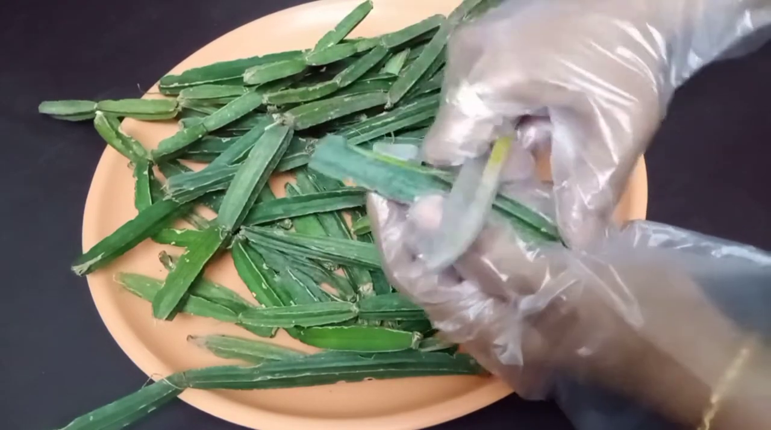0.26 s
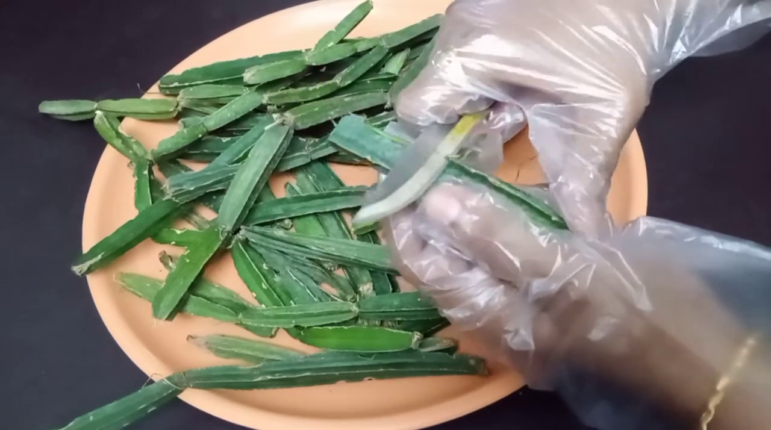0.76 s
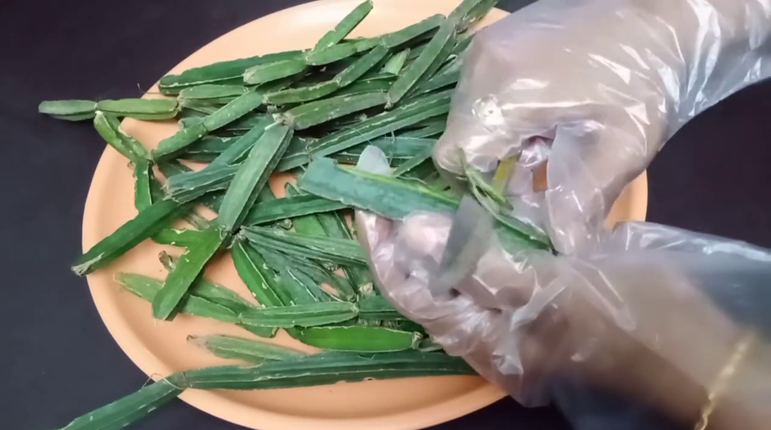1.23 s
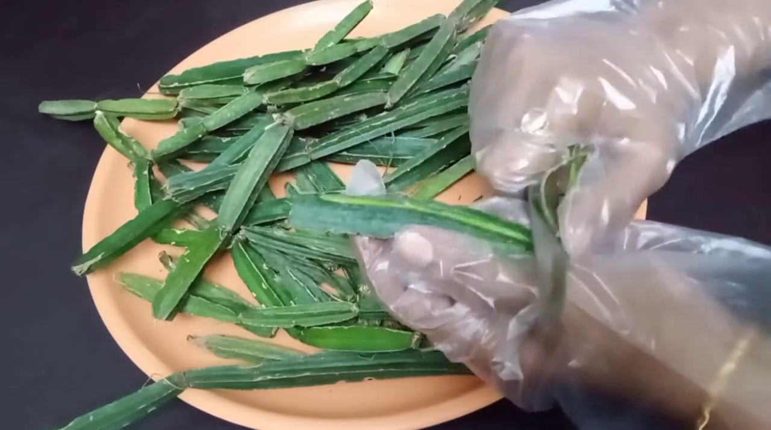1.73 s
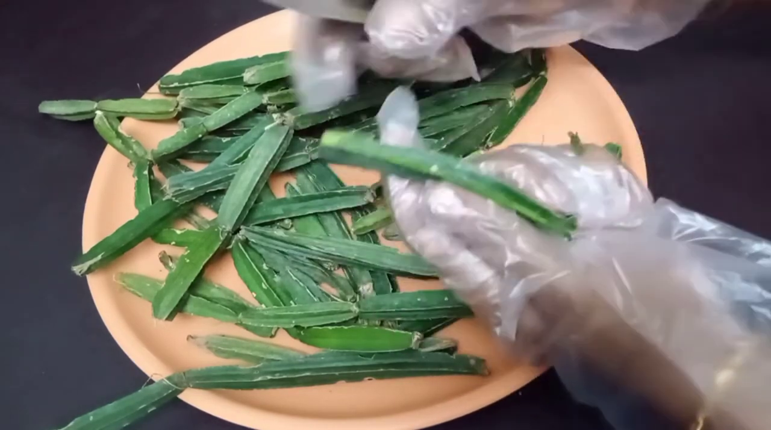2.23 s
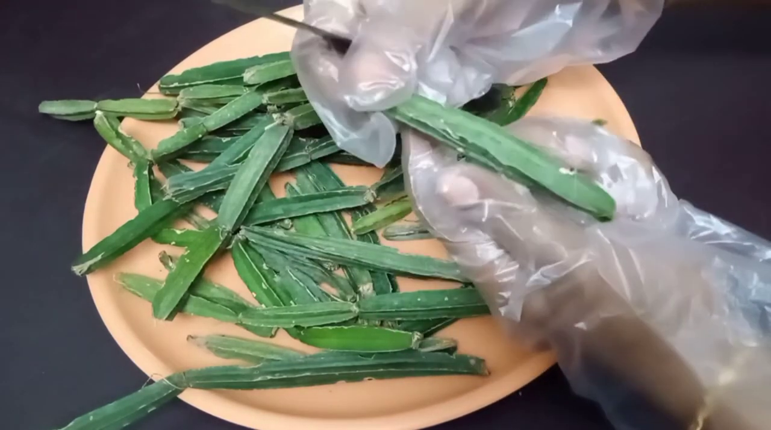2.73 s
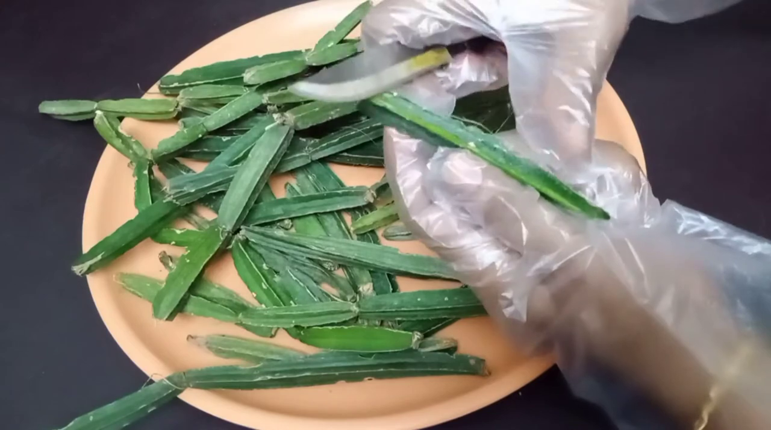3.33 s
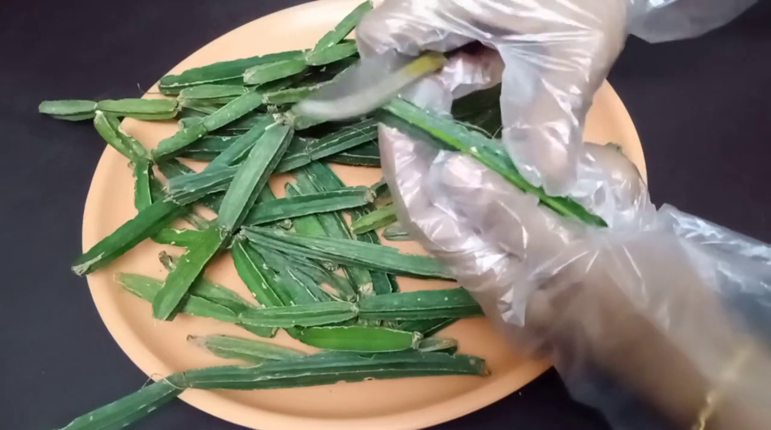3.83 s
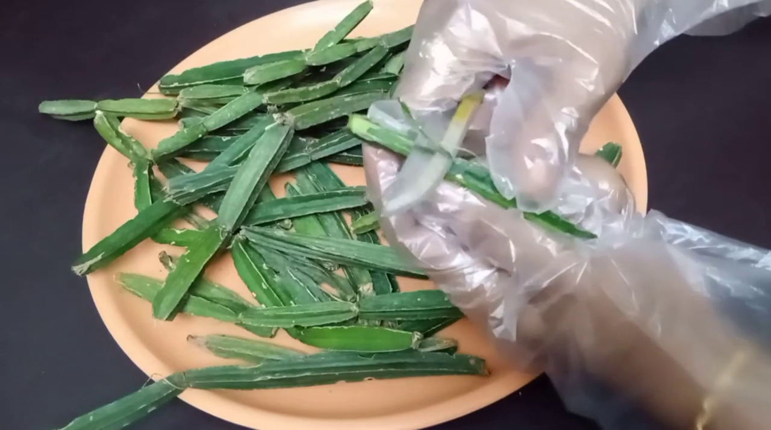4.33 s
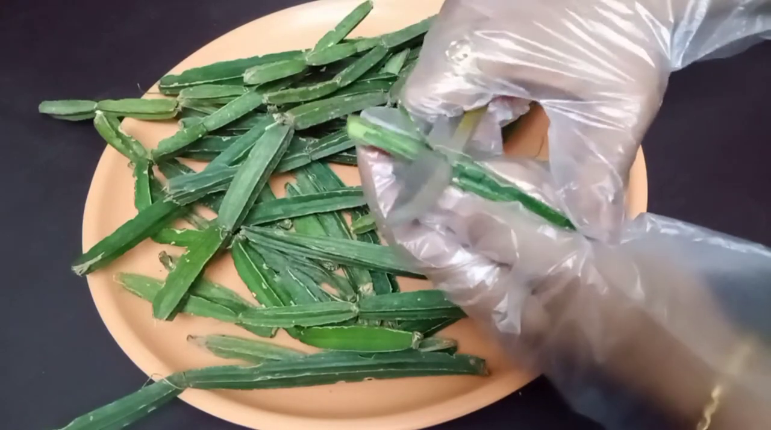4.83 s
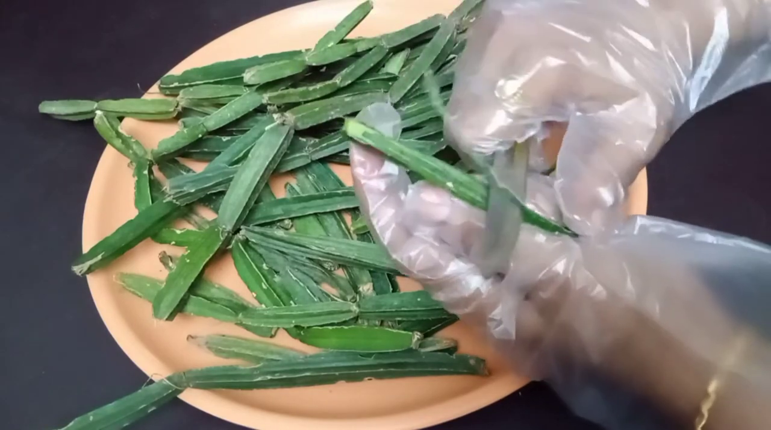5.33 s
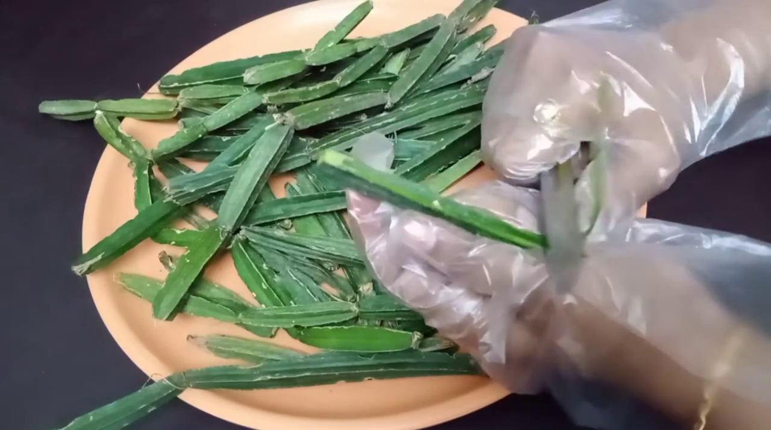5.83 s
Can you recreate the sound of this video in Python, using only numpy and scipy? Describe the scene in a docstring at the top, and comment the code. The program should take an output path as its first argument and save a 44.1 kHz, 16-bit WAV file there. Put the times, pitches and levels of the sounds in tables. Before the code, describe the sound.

A brief dull knock sounds at the start. Thin plastic gloves then crinkle continuously close to the microphone, swelling with each push and regrip of the fingers. Small sharp snaps of creases and plant fibres poke through, along with faint short rasps as a knife is pulled along the stems. The kitchen adds a slight, short reverberation and a very faint low hum.

```python
"""Gloved hands cutting stems

A kitchen, microphone close to hands in thin plastic gloves that pull a small knife along green stems.
The film buckles in thousands of tiny clicks, deeper when large folds move; creases and fibres snap,
and glove folds or blade rasp briefly. A dull knock rings the room at the start, low hum behind."""
import sys
import numpy as np
from scipy import signal
from scipy.io import wavfile
from scipy.ndimage import uniform_filter1d

SR = 44100
rng = np.random.default_rng(int(sys.argv[2]) if len(sys.argv) > 2 else 0)


def master_out(mix):
    """Clip the mix to full scale and print it as 16-bit PCM to the path in sys.argv[1]."""
    frames = np.transpose(np.atleast_2d(mix))
    ceiling = np.clip(frames, -1, 1)
    pcm = np.round(ceiling * 32767).astype(np.int16)
    wavfile.write(sys.argv[1], SR, pcm)


N = 267246
TIME = np.arange(N) / SR

# the gloves never quite rest: thin and faint holding the stem for a cut, fuller turning it over
# t/s, level/dB, lowest fold resonance f/Hz
GRIP_LEVELS = [(0.0, -42.0, 1760), (0.45, -42.5, 1440), (0.55, -49.0, 2940), (1.4, -44.0, 2750),
               (1.65, -40.5, 1460), (2.25, -39.5, 1422), (3.35, -40.5, 1499), (3.47, -48.0, 3240),
               (4.43, -47.5, 3380), (4.65, -44.0, 2159), (5.35, -45.5, 3610), (5.45, -43.0, 1520),
               (6.06, -41.5, 1530)]
# one rustle for each push or regrip of the fingers: t/s, hold/s, level/dB, fold resonance f/Hz
FINGER_RUSTLES = [(0, 0.077, -35.5, 700), (0.09, 0.057, -42.0, 1620), (0.178, 0.12, -34.5, 990),
                  (0.335, 0.13, -34.5, 780), (0.513, 0.056, -46.0, 2110), (0.673, 0.11, -44.5, 2650),
                  (0.814, 0.058, -38.0, 1581), (0.972, 0.055, -41.5, 1593), (1.065, 0.16, -43.5, 833),
                  (1.296, 0.096, -35.5, 840), (1.54, 0.18, -39.5, 1095), (1.734, 0.087, -37.0, 1420),
                  (1.929, 0.22, -35.5, 1455), (2.004, 0.033, -30.5, 1276), (2.109, 0.051, -31.5, 824),
                  (2.2, 0.079, -41, 1248), (2.397, 0.09, -37.5, 1160), (2.542, 0.11, -37.5, 1610),
                  (2.778, 0.12, -38.5, 2092), (2.92, 0.14, -35.5, 1380), (3.097, 0.06, -31.5, 1185),
                  (3.174, 0.096, -39.5, 1490), (3.308, 0.059, -37.0, 970), (3.484, 0.14, -43.5, 2460),
                  (3.664, 0.095, -40.5, 2670), (4.014, 0.098, -44, 1450), (4.224, 0.085, -42, 1596),
                  (4.317, 0.056, -42, 1279), (4.481, 0.058, -31.5, 1340), (4.541, 0.15, -37.5, 1189),
                  (4.742, 0.087, -44.5, 1790), (5.115, 0.097, -44.0, 1206), (5.264, 0.071, -41.5, 2865),
                  (5.377, 0.15, -38.0, 890), (5.613, 0.071, -34.5, 1251), (5.881, 0.055, -37.5, 1282)]
# colour of the crinkling film: f/Hz, level/dB
FILM_SPECTRUM = [(250, -18), (500, -10.5), (1000, -7.5), (2000, -7.5), (3400, -4), (5000, -3.5),
                 (6000, -1.5), (6900, 2), (7500, -1), (9200, -21), (10800, -19), (11400, -21), (13000, -12),
                 (15400, -9.5)]
# folds radiate little below their resonance: f/resonance, level/dB
FOLD_SPECTRUM = [(.25, -16.5), (.5, -17.5), (.7, -12), (.85, -9.5), (1.02, -3), (1.25, -3), (1.7, 0),
                 (3, -0.5)]
# air pockets colour most around the lowest resonance: f/resonance, ripple depth/dB
POCKET_RIPPLE = [(.5, 5), (1, 5.3), (1.5, 3.5), (2.2, 1.3), (4, .4)]
# the loudest snaps of creases and fibres: t/s, level/dB, ring f/Hz, decay/s
LOUD_SNAPS = [(0.2077, -25.5, 5370, 0.0035), (0.527, -39, 6500, 0.002), (0.698, -42, 6550, .002),
              (0.7858, -29.5, 6450, 0.00093), (0.997, -31.5, 6800, 0.0025), (1.023, -31, 6500, .0018),
              (1.077, -30, 4650, .002), (1.1854, -33, 6400, .0017), (1.494, -25.5, 7000, 0.0018),
              (1.659, -24.5, 7150, .0018), (1.805, -28, 6850, 0.0014), (2.021, -28, 6570, 0.0025),
              (2.033, -20, 6470, .0043), (2.137, -26, 7140, .0024), (2.7771, -19, 5900, 0.0011),
              (2.8162, -24, 6390, 0.0016), (2.947, -29, 5700, 0.0017), (3.552, -37, 6800, 0.0017),
              (3.6015, -35.5, 3930, 0.0018), (3.685, -35, 7110, 0.0033), (3.767, -32, 6645, 0.0011),
              (3.923, -22.5, 4360, .0012), (3.992, -32, 6950, 0.0021), (4.081, -29, 6436, .0016),
              (4.1944, -33.5, 7154, 0.0049), (4.346, -34, 7080, 0.0028), (4.444, -41, 6755, 0.001),
              (4.495, -29, 6200, 0.0025), (4.5116, -24, 7123, 0.0026), (4.5196, -24, 7163, 0.0017),
              (4.6054, -24, 6940, .0021), (4.7633, -26.5, 6760, 0.0017), (4.8184, -26, 6390, 0.0012),
              (5.0838, -25, 7100, 0.00062), (5.156, -28.5, 7400, 0.0021), (5.639, -23, 6560, 0.0048),
              (5.771, -30, 4990, .002), (6.0506, -32, 4695, 0.0047)]
# short pitched rasps of glove folds or blade: t/s, length/s, level/dB, resonance f/Hz
HOLLOW_RASPS = [(0.342, .16, -46, 1180), (0.613, 0.056, -55, 2870), (0.768, 0.043, -46, 2950),
                (1.14, 0.15, -56, 1284), (1.572, 0.15, -54, 1060), (1.754, 0.071, -40.5, 1820),
                (2.101, 0.071, -48.5, 1116), (2.714, 0.22, -64, 1445), (2.95, 0.12, -52, 1411),
                (3.255, 0.041, -49.5, 991), (3.51, 0.083, -59, 2846), (3.581, .099, -65, 2740),
                (3.665, 0.09, -62.5, 1037), (5.122, 0.088, -55, 1322), (5.244, .14, -61.5, 1420),
                (5.375, 0.086, -45.5, 1023)]
# soft bumps of the hands: t/s, length/s, level/dB
HAND_BUMPS = [(0.775, 0.13, -61.5), (1.296, 0.16, -70), (1.80, 0.13, -77), (2.073, 0.12, -68),
              (3.175, 0.11, -70), (3.332, 0.092, -68)]
# low room modes ringing after a dull knock: f/Hz, level/dB, t60/s
KNOCK_MODES = [(179, -26, 0.079), (248, -35.5, 0.15), (331, -29, 0.16), (433, -32, 0.13), (602, -37.5, .08),
               (650, -46, 0.13)]
# reverberation of the kitchen: f/Hz, t60/s
KITCHEN_DECAY = [(300, 0.22), (1500, 0.14), (6000, 0.099), (15000, 0.013)]
# colour of the room hum: f/Hz, level/dB
HUM_SPECTRUM = [(25, -48), (60, -15.5), (100, -11), (135, -6), (178, -0.5), (215, 1.5), (250, -2),
                (290, -4.5), (335, -2.5), (450, -10.5), (700, -24.5), (1500, -10), (6000, -33.5)]


def amp(db):
    """Decibels to gain."""
    return 10 ** (np.asarray(db) / 20)


def unit_rms(x):
    """Scales to rms 1."""
    return x / np.sqrt(np.mean(x ** 2) + 1e-20)


def curve_at(points, hz):
    """Reads a curve on a log-frequency axis."""
    f, value = np.transpose(points)
    return np.interp(np.log(hz + 1), np.log(f + 1), value)


def add(mix, start_s, sound):
    """Mixes a sound in at its start time."""
    part = mix[max(round(start_s * SR), 0):][:len(sound)]
    part += sound[:len(part)]


def colour(x, spectrum):
    """Minimum-phase filter with the given spectrum."""
    log_gain = np.log(amp(curve_at(spectrum, abs(np.fft.fftfreq(4096, 1 / SR)))))
    taps = np.fft.ifft(np.exp(np.conj(signal.hilbert(log_gain)))).real[:2048]
    return signal.oaconvolve(x, taps)[:len(x)]


def band(x, low_hz, high_hz, order=2):
    """Butterworth band-pass."""
    return signal.sosfilt(signal.butter(order, [low_hz, high_hz], "band", fs=SR, output="sos"), x)


def clicks(per_s, spread_db, max_spreads):
    """Random impulses, many small and a few large."""
    size = amp(spread_db * np.minimum(rng.exponential(1, N), max_spreads))
    return size * rng.choice([-1, 1], N) * (rng.random(N) < per_s / SR)


def gloves():
    """Right at the microphone: crinkle and snaps, deepened by large folds, coloured by air pockets."""
    level_db, fold_hz = hand_motion()
    film = crinkle(level_db) + snaps(list(LOUD_SNAPS) + lesser_snap_rows(level_db))
    hz, t, spectra = signal.stft(film, SR, nperseg=512, noverlap=384)
    multiple = hz[:, None] / np.interp(t, TIME, fold_hz)
    pockets = uniform_filter1d(rng.standard_normal(spectra.shape), size=2, axis=0)
    pockets = uniform_filter1d(pockets, size=22, axis=1)  # the pockets shift gradually
    pockets = unit_rms(pockets - uniform_filter1d(pockets, size=7, axis=0))  # peaks between hollows
    ripple_db = curve_at(POCKET_RIPPLE, multiple) * np.minimum(pockets, 1.6)
    spectra = spectra * amp(curve_at(FOLD_SPECTRUM, multiple) + ripple_db)
    return signal.istft(spectra, SR, nperseg=512, noverlap=384)[1][:N]


def hand_motion(attack_s=.028, release_s=.025, sag_db=2.0, waver_s=.035, waver_db=1.0, waver_oct=.17):
    """Level/dB and fold resonance/Hz over time: rustles add to the grip, the loudest leads the pitch."""
    grip_s, grip_db, grip_hz = np.transpose(GRIP_LEVELS)
    power = amp(np.interp(TIME, grip_s, grip_db)) ** 2
    weighted_octave = power * np.interp(TIME, grip_s, np.log2(grip_hz))
    t = np.arange(SR // 2) / SR
    for start, hold, db, hz in FINGER_RUSTLES:
        envelope = np.minimum(t / attack_s, 1) * np.exp(-np.maximum(t - hold, 0) / release_s)
        rustle_power = (envelope * amp(db - sag_db * np.minimum(t / hold, 1))) ** 2
        add(power, start, rustle_power)
        add(weighted_octave, start, rustle_power * np.log2(hz))
    # the fingers move unevenly: a harder push is louder and moves larger, deeper folds
    push = np.interp(TIME / waver_s, np.arange(1024), rng.standard_normal(1024))
    level_db = 10 * np.log10(power) + waver_db * push
    fold_hz = 2 ** (weighted_octave / power - waver_oct * push)
    return level_db, fold_hz


def crinkle(level_db):
    """The small clicks in the colour of the film, as loud as the hands are vigorous."""
    film = colour(facets(level_db), FILM_SPECTRUM)
    treble_rms = np.std(band(film, 4100, 13000, order=3))
    return film / treble_rms * amp(level_db - 0.23)


def facets(level_db, slide_gain=.62, clump_db=0.2):
    """Facets of all sizes buckle over the hiss of film sliding on film."""
    pace = np.interp(level_db, [-47, -33], [.35, 1])  # brisk hands: denser clicks, more sliding
    train = clicks(per_s=1900, spread_db=3.0, max_spreads=3.84) * (rng.random(N) < pace)
    pitch_hz = rng.uniform(958, 15080, N)
    onsets = np.flatnonzero(train)
    grains = train[onsets, None] * buckle(pitch_hz[onsets, None])
    positions = onsets[:, None] + np.arange(grains.shape[1])
    crackle = np.bincount(positions.ravel(), grains.ravel(), N)[:N]
    clumps = unit_rms(uniform_filter1d(rng.standard_normal(N), size=300))  # film gives way in fits
    hiss = slide_gain * pace * rng.standard_normal(N)
    crush = (unit_rms(crackle) + hiss) * amp(clump_db * np.minimum(clumps, 1.5))
    return crush / np.sqrt(uniform_filter1d(crush ** 2, size=2000))  # held even: the hands set the level


def buckle(hz, cycles=9.1, flutter_s=0.0017, ring_gain=0.48):
    """A facet of film flips: a few cycles at its own pitch and a brief flutter of the film around it."""
    t = np.arange(256) / SR
    tone = np.sin(2 * np.pi * hz * t) * np.exp(-t * hz / cycles)
    flutter = rng.standard_normal(tone.shape) * np.exp(-t / flutter_s)
    return ring_gain * tone / tone.std(axis=-1, keepdims=True) + unit_rms(flutter)


def snaps(rows, rise_s=.00035, ring_q=10, ring_gain=0.48):
    """A taut crease or a fibre lets go: a burst of flutter, partly ringing at the pitch of the crease."""
    out, t = np.zeros(N), np.arange(1024) / SR
    for start, db, hz, decay_s in rows:
        flutter = rng.standard_normal(len(t))
        tone = unit_rms(signal.lfilter(*signal.iirpeak(hz, ring_q, fs=SR), flutter))
        envelope = (1 - np.exp(-t / rise_s)) * np.exp(-t / decay_s)
        burst = colour((unit_rms(flutter) + ring_gain * tone) * envelope, FILM_SPECTRUM)
        burst *= np.sqrt(decay_s * SR / np.sum(burst ** 2))
        add(out, start, amp(db - 1.8) * burst)
    return out


def lesser_snap_rows(level_db, count=40, snap_db=-30.5, usual_db=-45.5, hz=6980, decay_s=0.00081):
    """Lesser snaps come at random moments and grow with the vigour of the hands."""
    when, pitch, length = rng.random((count, 3)).T
    starts = when * N / SR
    vigour_db = np.interp(starts, TIME, level_db) - usual_db
    db = snap_db + 0.9 * vigour_db + 0.5 * rng.standard_normal(count)
    return list(zip(starts, db, hz * (.9 + .2 * pitch), decay_s * (.5 + length)))


def hollow_rasps():
    """Glove folds or blade stick and slip, each time a short rasp around one resonance."""
    out = np.zeros(N)
    slips = clicks(per_s=500, spread_db=3.5, max_spreads=2.5)
    for start, length, db, hz in HOLLOW_RASPS:
        resonance = band(slips, hz * 0.925, hz * 1.08)
        rasp = unit_rms(resonance[round(start * SR):][:round(length * SR)])
        add(out, start, amp(db) * rasp * signal.windows.hann(len(rasp)))
    return out


def knock(start_s=.014, rise_s=0.0021, puff_db=-36, puff_s=0.023):
    """A dull knock: a short puff of noise, and low room modes ring after it."""
    out, t = np.zeros(N), np.arange(SR // 2) / SR
    ring = sum(amp(db - 60 * t / t60) * np.sin(2 * np.pi * hz * t) for hz, db, t60 in KNOCK_MODES)
    puff = unit_rms(band(rng.standard_normal(len(t)), 194, 570)) * amp(puff_db) * np.exp(-t / puff_s)
    attack = 1 - np.exp(-t / rise_s)
    add(out, start_s, band((ring + puff) * attack, 95, 2000))
    return out


def hand_bumps():
    """The moving hands push a little air and nudge the plate."""
    out = np.zeros(N)
    rumble = band(rng.standard_normal(N), 53, 130)
    for start, length, db in HAND_BUMPS:
        bump = unit_rms(rumble[round(start * SR):][:round(length * SR)])
        add(out, start, amp(db) * bump * signal.windows.hann(len(bump)))
    return out


def kitchen(direct, tail_count=6, tails_per_s=14):
    """The hands keep moving, so the pattern of reflections fades from one tail to the next."""
    position = TIME * tails_per_s
    offset = abs((position - np.arange(tail_count)[:, None] + 1) % tail_count - 1)
    crossfades = np.cos(np.pi / 2 * np.minimum(offset, 1))
    return sum(signal.oaconvolve(direct * fade, reflections())[:N] for fade in crossfades)


def reflections(per_s=3000, gap_s=.003):
    """A short tail of sparse reflections reaches the microphone, each band dying at its own speed."""
    taps = rng.standard_normal(SR // 2) * (rng.random(SR // 2) < per_s / SR)
    taps[:round(gap_s * SR)] = 0
    hz, t, spectra = signal.stft(taps, SR, nperseg=256)
    decay = amp(-60 * t / curve_at(KITCHEN_DECAY, hz)[:, None])
    tail = signal.istft(spectra * decay, SR, nperseg=256)[1]
    return tail / np.linalg.norm(tail)


def room_hum(level_db=-67.5):
    """Room tone: steady low noise, far below the hands."""
    return amp(level_db) * unit_rms(colour(rng.standard_normal(N), HUM_SPECTRUM))


def scene(reflections_db=-15):
    """One microphone: the handling up close, a knock, the kitchen's reflections and hum behind."""
    direct = gloves() + hollow_rasps() + hand_bumps() + knock()
    return (direct + amp(reflections_db) * kitchen(direct) + room_hum())[None]


def record(dry):
    """The recorder's band limit takes off the highest treble."""
    low_pass = signal.firwin(511, cutoff=15750, window=("kaiser", 9), fs=SR)
    return signal.oaconvolve(dry, low_pass[None], "same")


dry = scene()
out = record(dry)
master_out(out)
```